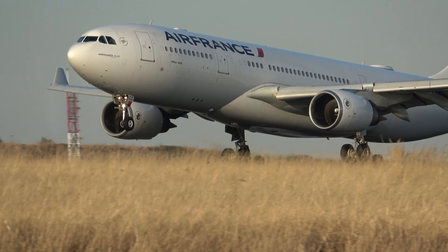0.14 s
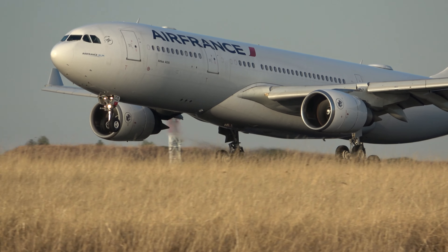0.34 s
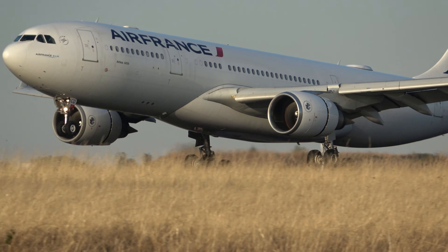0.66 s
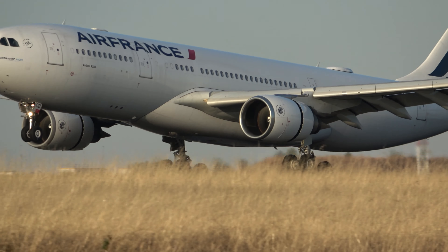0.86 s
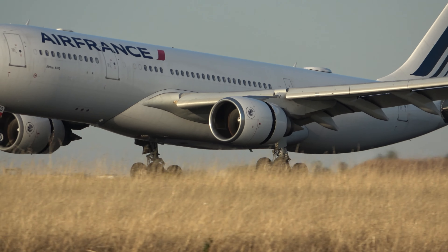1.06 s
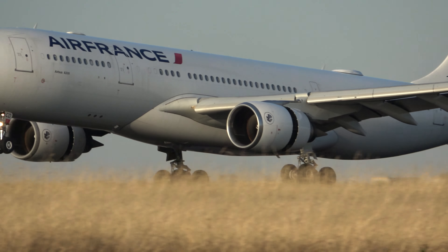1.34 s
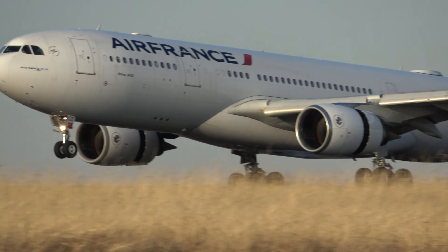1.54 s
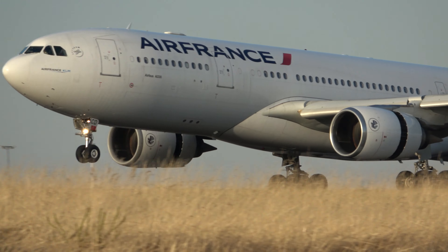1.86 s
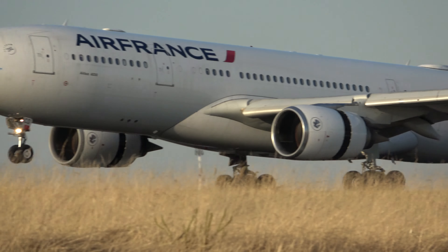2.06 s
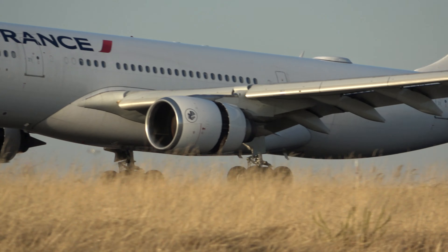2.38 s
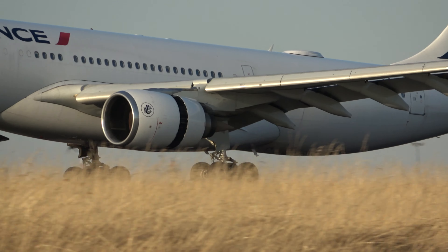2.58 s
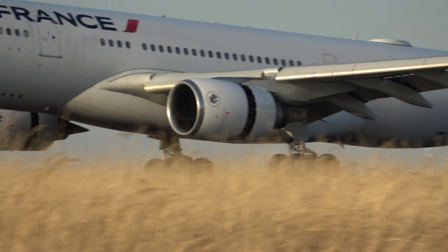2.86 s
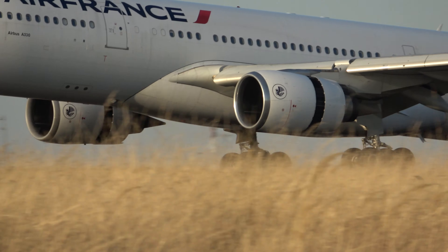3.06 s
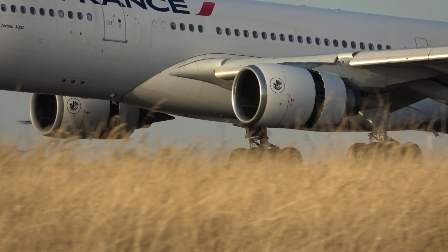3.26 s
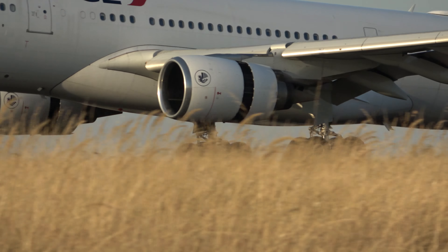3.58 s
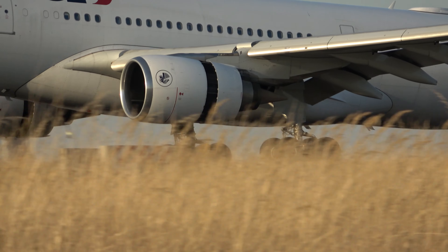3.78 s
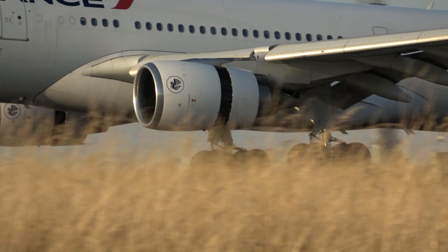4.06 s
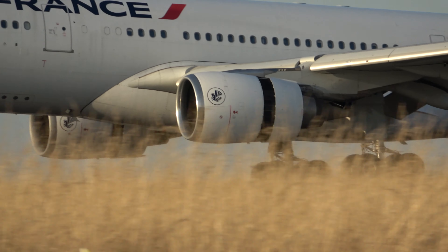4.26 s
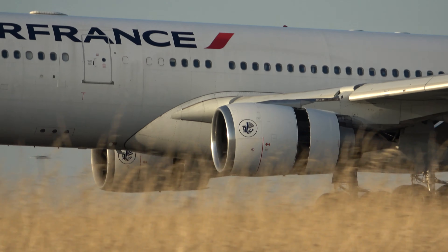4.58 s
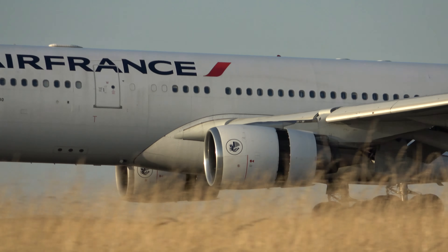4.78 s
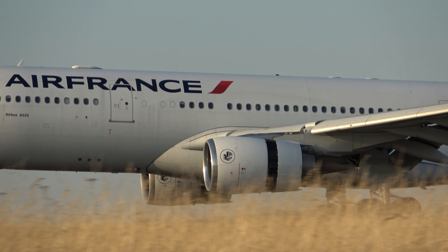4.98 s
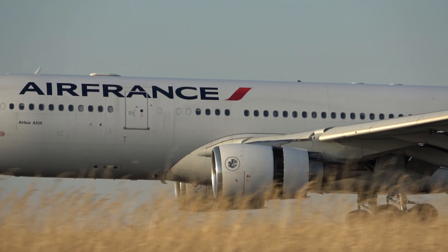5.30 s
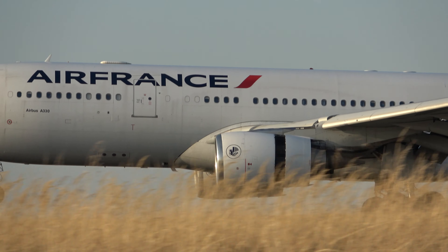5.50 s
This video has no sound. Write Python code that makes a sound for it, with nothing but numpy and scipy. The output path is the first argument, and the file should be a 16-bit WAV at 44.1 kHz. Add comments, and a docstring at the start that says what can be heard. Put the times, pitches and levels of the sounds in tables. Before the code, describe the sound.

Open windy field beside a runway, one distant-perspective microphone, no echo. From 0 s, low lumpy wind buffets and flutters, overloading slightly at its peaks, with gusts every few tenths of a second and tiny lulls between. A rough, high turbine whine near 3.1 kHz sinks gradually to about 2.6 kHz by 3 s, clearest around 0.7 to 1.5 s, with a fainter, slightly lower second engine beside it. Beneath is a modest hollow jet roar. From about 2.2 s reverse thrust grows; by 3.4 s a broad rushing roar dominates the jet sound and the whine is almost buried. A brief mid-low howl colours it near 3.9 s. A sudden wind slap thuds at 4.6 s. Around 5.1 to 5.3 s the exhaust leaps into a bright, hissing blast with a faint higher whine rising, eases near 5.4 s, then surges again and stops at full strength around 5.6 s.

```python
"""A jet airliner rolls out after touchdown, heard across a windy grass field: its turbine whines sink,
then the reversed exhaust swells into a brighter and brighter roar while wind buffets the microphone.
The exhaust is bands of shaped noise, the whines are sine tones roughened by slow chance, and the wind is
low lumpy noise mixed with throbbing eddies, plus one sudden slap. A limiter and clipper catch the peaks."""
import sys
import numpy as np
from scipy import signal
from scipy.fft import rfft, irfft, next_fast_len
from scipy.io import wavfile
from scipy.ndimage import uniform_filter1d, minimum_filter1d

SR = 44100
rng = np.random.default_rng(int(sys.argv[2]) if len(sys.argv) > 2 else 0)


def unload_wav(signal):
    """Save mono or channel-first audio to the path in sys.argv[1] as 16-bit WAV at rate SR, clipped to [-1, 1]."""
    wavfile.write(
        sys.argv[1],
        SR,
        np.round(np.clip(np.atleast_2d(signal).T, -1, 1) * 32767).astype(np.int16),
    )


N = 248724

# Colour of the microphone hiss. Each row: frequency in Hz, relative level per Hz in dB.
MIC_HISS_COLOUR = [(3000, 5), (6800, 5), (9000, 0.5), (15500, -3.5)]

# Steady wind on the microphone, before gusts, lulls and flurries.
# Each row: time in seconds, buffeting level in dB, flutter level in dB.
WIND_LEVELS = [(0, -17, -23), (.45, -13.5, -28.5), (1.5, -10.7, -26), (2.2, -12.8, -26), (2.7, -14, -23.8),
               (3.3, -15.3, -26.5), (4.1, -13.5, -23.5), (4.85, -12, -17.3), (5.18, -13.3, -20.5),
               (5.35, -8.7, -17.7), (5.64, -11.7, -19.7)]
# Eddies shed at the microphone. Each row: time in seconds, mean eddies per second,
# share of the buffeting power from 0 to 1.
EDDY_SHEDDING = [(0, 48.6, .25), (1.05, 38.8, .5), (1.3, 26, .75), (1.85, 31.2, .7), (2.5, 18.1, 0.5),
                 (2.98, 49, .25), (3.3, 20, .35), (4.4, 31, .3), (4.7, 46.3, .55), (5.5, 53, .9)]
# Colour of the slow, lumpy buffeting. Each row: frequency in Hz, relative level per Hz in dB.
BUFFET_COLOUR = [(6, -11.5), (12, -0.5), (22, 0), (35, -3.5), (52, -1), (68, -5), (90, -19.5), (140, -40.5)]
# Colour of the quicker flutter. Each row: frequency in Hz, relative level per Hz in dB.
FLUTTER_COLOUR = [(45, -14), (72, 0), (95, -4), (125, -9.5), (160, -15.5), (230, -27), (600, -48)]
# The strongest gusts. Each row: centre in seconds, length in seconds, lift of the buffeting in dB,
# lift of the flutter in dB.
GUSTS = [(.42, 0.084, 2.5, -3), (.59, 0.078, 2.5, 1), (.8, .07, 3.5, 2), (1.03, .07, 1, 5),
         (1.19, .1, 3, 0), (1.4, .1, -0.5, 6), (1.72, 0.13, 1, 5), (1.83, .07, 3.5, 0), (1.99, .07, 3, -3),
         (2.11, .07, 4, 3), (3.02, 0.24, 5, 0), (3.26, .12, 3.5, -0.5), (3.51, .05, 6, 1),
         (3.7, .1, 3.5, 2), (4.44, .1, 6, 1), (4.76, .14, 5, 1), (5.56, .08, 2, 1)]
# Moments when the wind drops. Each entry: centre in seconds.
LULL_TIMES = [.73, 1.93, 2.2, 2.82, 3.42, 3.59, 3.88, 4.53, 4.99]
LULL_LENGTH_S, LULL_DB = 0.061, -6.5
FLURRY_DB, FLURRY_RATE_HZ = 1.2, 6.1  # chance swings of the wind's level

# Turbine whine, winding down and then up for reverse thrust. Each row: time in seconds, pitch in Hz,
# reference level in dB, upper stage level in dB.
WHINE = [(0, 3155, -46.5, -78), (.45, 3060, -44.5, -74), (.7, 3010, -41.5, -71), (1.1, 2936, -41.5, -63),
         (1.45, 2863, -40, -62), (1.75, 2810, -44.5, -64), (2.15, 2740, -45, -60), (2.4, 2705, -48, -64),
         (2.95, 2600, -46.5, -53.5), (3.4, 2620, -48, -58), (3.8, 2686, -62.5, -69),
         (4.95, 2680, -60.5, -58.5), (5.1, 2735, -55, -46), (5.25, 2810, -54, -42), (5.4, 2800, -61, -58),
         (5.64, 2780, -65, -66)]
# Blade rows that beam forwards. Each row: multiple of the whine pitch,
# level in dB relative to the whine's reference, before the forward fade.
FORWARD_ROWS = [(1.335, -19), (1.455, -13)]

# Strength of the jet at the microphone, as the airliner nears and the reversers open.
# Each row: time in seconds, strength in dB.
JET_STRENGTH = [(0, -18), (.75, -14.5), (1.25, -14), (1.7, -15.5), (2.2, -12), (2.85, -8), (3.15, -2.5),
                (3.48, 0.2), (4.0, -1), (4.85, 2.5), (5.08, 5.5), (5.2, 12), (5.3, 12), (5.43, 8),
                (5.6, 13)]
# The jet noise surges and sags. Each row: centre in seconds, length in seconds, lift of the roar in dB,
# of the rush in dB, of the bright band in dB, of the hollow ring in dB.
SURGES = [(1.05, .55, 1.3, 3.3, .8, 1.8), (1.78, .35, 1, -.3, -1.8, -3), (2.22, .22, 0, 3, 1.5, .5),
          (2.68, .3, 3, .3, -.5, -2), (3.44, .45, -1.8, 3.3, 1.6, .8), (4.1, .45, 1, -1.3, 0, 2),
          (4.62, .22, .5, -2.5, -.3, -1.5), (5.55, .22, 0, 4.5, 1.3, 3)]
# Colour of the deep roar. Each row: frequency in Hz, relative level per Hz in dB.
ROAR_COLOUR = [(90, -10.5), (160, 0), (205, -0.6), (270, 0.23), (350, -2.2), (450, 0.3), (600, -2),
               (850, -1.5), (1200, -9.5), (2000, -26.5)]
# Colour of the mid rush. Each row: frequency in Hz, relative level per Hz in dB.
RUSH_COLOUR = [(600, -14.5), (1150, 0.5), (1600, 0.5), (2000, -3.5), (2400, -7.5), (3000, -20.5),
               (3600, -34)]
# Colour of the bright band. Each row: frequency in Hz, relative level per Hz in dB.
BRIGHT_COLOUR = [(1600, -17), (2000, -3.5), (2400, -2), (2900, -0.5), (3250, -1.2), (3550, -0.4),
                 (3900, -8), (4400, -31)]
# Colour of the exhaust hiss. Each row: frequency in Hz, relative level per Hz in dB.
HISS_COLOUR = [(3000, -10), (4000, 0.5), (4600, 1), (5050, -2.5), (5550, -6.5), (6050, -16.5),
               (6700, -24.5), (7600, -33.5), (10000, -45), (15000, -54)]
# Each part of the jet: base level in dB at strength 0, and dB gained per dB of strength.
ROAR_DB, ROAR_FOLLOWS = -24.5, 0.37
RUSH_DB, RUSH_FOLLOWS = -28.7, 0.46
BRIGHT_DB, BRIGHT_FOLLOWS = -31.3, 0.75
HISS_DB = -41.5  # follows the strength one for one
HOLLOW_DB, HOLLOW_FOLLOWS = -26.8, 0.14
HOWL_AT_S, HOWL_LENGTH_S, HOWL_DB = 3.925, 0.43, -29.5  # one brief engine howl

TOP_CUTOFF_HZ = 16400


def from_db(db):
    """Decibels to gain."""
    return 10 ** (np.asarray(db) / 20)


def rms_one(x):
    """Scale to unit rms."""
    return x / np.sqrt(np.mean(x ** 2) + 1e-20)


def in_time(rows):
    """Draw one sample-by-sample curve for each column after the time."""
    times, *columns = np.transpose(rows)
    return [np.interp(np.arange(N) / SR, times, column) for column in columns]


def swell(at_s, length_s):
    """A bell-shaped rise and fall of height 1, with the given length at half height."""
    offset = np.arange(N) / SR - at_s
    return 2 ** -((2 * offset / length_s) ** 2)


def lifts(rows):
    """Sum a table of swells into one dB curve for each of its level columns."""
    return sum(np.outer(db, swell(at_s, length_s)) for at_s, length_s, *db in rows)


def shaped_noise(gain_at):
    """Unit-rms noise whose amplitude spectrum is a function of frequency."""
    size = next_fast_len(N)
    hz = np.maximum(np.fft.rfftfreq(size, 1 / SR), 1)
    spectrum = rfft(rng.standard_normal(size)) * gain_at(hz)
    return rms_one(irfft(spectrum, size)[:N])


def coloured(points):
    """Noise with a given spectrum, falling steeply beyond its ends."""
    f, db = np.transpose(points)

    def gain_at(hz):
        skirts = np.minimum(1, np.minimum(hz / f[0], f[-1] / hz)) ** 6
        return from_db(np.interp(np.log(hz), np.log(f), db)) * skirts

    return shaped_noise(gain_at)


def resonant(centre_hz, width_hz):
    """Noise through a resonance; width is from the centre to half amplitude."""
    return shaped_noise(lambda hz: 1 / (1 + ((hz - centre_hz) / width_hz) ** 2))


def drift(rate_hz):
    """Slow chance wandering of spread 1, at half amplitude by the given rate."""
    return shaped_noise(lambda hz: 1 / (1 + (hz / rate_hz) ** 2))


def evened(x, span_s):
    """Hold the slow level of a sound steady and keep its fast lumps."""
    power = uniform_filter1d(x ** 2, max(int(span_s * SR), 2))
    return rms_one(x / np.sqrt(power + 1e-6))


def microphone_hiss():
    """Electrical self-noise: a faint, steady treble hiss."""
    return from_db(-71) * coloured(MIC_HISS_COLOUR)


def wind(overtone_db):
    """Lumpy pressure at the microphone, with gusts and lulls; regular eddies throb in steady flow."""
    lulls = LULL_DB * sum(swell(at_s, LULL_LENGTH_S) for at_s in LULL_TIMES)
    flurries = FLURRY_DB * drift(FLURRY_RATE_HZ)
    buffet_db, flutter_db = in_time(WIND_LEVELS) + lifts(GUSTS) + lulls + flurries

    eddy_hz, share = in_time(EDDY_SHEDDING)
    wandering_hz = eddy_hz * (1 + 0.0601 * drift(rate_hz=15))
    phase = 2 * np.pi * np.cumsum(wandering_hz) / SR
    throb = np.sqrt(2) * (np.sin(phase) + from_db(overtone_db) * np.sin(2 * phase))
    lumps = evened(coloured(BUFFET_COLOUR), span_s=0.17)
    # square roots share out power rather than amplitude
    pressure = evened(np.sqrt(share) * throb + np.sqrt(1 - share) * lumps, span_s=0.12)

    small_eddies = evened(coloured(FLUTTER_COLOUR), span_s=0.08)
    return from_db(buffet_db) * pressure + from_db(flutter_db) * small_eddies


def gust_slap(at_s, pitch_hz, drive_db, decay_s):
    """One sudden gust slaps the microphone: a few dying swings of pressure, softened by a low-pass."""
    age = np.maximum(np.arange(N) / SR - at_s, 0)
    swings = np.sin(2 * np.pi * pitch_hz * age) * np.exp(-age / decay_s)
    soften = signal.butter(2, 300, fs=SR, output="sos")
    return from_db(drive_db) * signal.sosfilt(soften, swings)


def blade_tone(pitch_hz, scatter_hz, steady):
    """One blade row's tone, scattered by turbulent air into a narrow, rough band around its pitch."""
    wandering_hz = pitch_hz * (1 + 0.004 * drift(rate_hz=25))
    phase = 2 * np.pi * np.cumsum(wandering_hz) / SR
    in_step = (steady + drift(scatter_hz)) * np.sin(phase)
    out_of_step = drift(scatter_hz) * np.cos(phase)
    return rms_one(in_step + out_of_step)


def turbine_whine(forward_fade_db_per_s, far_engine_db):
    """Blade rows on one shaft glide together; the forward ones fade as the intake turns away."""
    pitch, level, upper = in_time(WHINE)
    out = from_db(level - 2) * blade_tone(pitch, scatter_hz=40, steady=1.1)
    # the far engine turns a little slower
    far_engine = blade_tone(0.955 * pitch, scatter_hz=70, steady=0.4)
    out += from_db(level + far_engine_db) * far_engine
    out += from_db(upper) * blade_tone(1.783 * pitch, scatter_hz=45, steady=0.8)
    forward = level - forward_fade_db_per_s * np.arange(N) / SR
    for multiple, db in FORWARD_ROWS:
        out += from_db(forward + db) * blade_tone(multiple * pitch, scatter_hz=35, steady=0.97)
    return out


def engine_resonances():
    """A broad hollow ring that grows more slowly than the roar, and a brief narrow howl below it."""
    strength, = in_time(JET_STRENGTH)
    *_, ring_lift = lifts(SURGES)
    hollow_db = HOLLOW_DB + HOLLOW_FOLLOWS * strength + ring_lift
    ring = from_db(hollow_db) * evened(resonant(centre_hz=932, width_hz=131), span_s=0.29)
    howl_level = from_db(HOWL_DB) * swell(HOWL_AT_S, HOWL_LENGTH_S)
    howl = howl_level * evened(resonant(centre_hz=483.0, width_hz=11), span_s=0.23)
    return ring + howl


def dulled(x, level_db, corner_hz, per_db):
    """The fainter and farther the jet, the more of its treble the air has taken."""
    low_pass = signal.butter(2, corner_hz, fs=SR, output="sos")
    dull = signal.sosfiltfilt(low_pass, x)
    far = np.clip((level_db.max() - level_db) * per_db, 0, 1)
    return evened(x + far * (dull - x), span_s=0.16)


def jet_noise(shimmer_db):
    """Exhaust turbulence: big eddies roar, small ones rush and hiss and grow faster with strength."""
    strength, = in_time(JET_STRENGTH)
    roar_lift, rush_lift, bright_lift, _ = lifts(SURGES)
    shimmer = shimmer_db * drift(rate_hz=17)  # moving air makes the highs flicker

    roar_db = ROAR_DB + ROAR_FOLLOWS * strength + roar_lift
    roar = from_db(roar_db) * evened(coloured(ROAR_COLOUR), span_s=0.2)
    rush_db = RUSH_DB + RUSH_FOLLOWS * strength + rush_lift + shimmer
    rush = from_db(rush_db) * coloured(RUSH_COLOUR)
    bright_db = BRIGHT_DB + BRIGHT_FOLLOWS * strength + bright_lift + shimmer
    bright_noise = dulled(coloured(BRIGHT_COLOUR), strength, corner_hz=2300, per_db=0.013)
    bright = from_db(bright_db) * bright_noise
    hiss = from_db(HISS_DB + strength + shimmer) * evened(coloured(HISS_COLOUR), span_s=0.19)
    return roar + rush + bright + hiss


def scene():
    """Layer the microphone hiss, the wind and the airliner into one channel."""
    gusts = wind(overtone_db=-20.5)
    gusts += gust_slap(at_s=4.605, pitch_hz=104, drive_db=-4, decay_s=0.026)
    airliner = turbine_whine(forward_fade_db_per_s=3.0, far_engine_db=-9.0)
    airliner += engine_resonances() + jet_noise(shimmer_db=0.8)
    return (microphone_hiss() + gusts + airliner)[None]


def record(dry):
    """A quick limiter ducks the biggest peaks, their last tips clip, and the top is cut."""
    hold = int(0.006 * SR)  # 6 ms, used for the limiter and the opening fade
    ducking = minimum_filter1d(np.minimum(1, 1.15 / (np.abs(dry) + 1e-9)), hold)
    clipped = np.clip(dry * uniform_filter1d(ducking, hold), -1, 1)
    fade_in = np.minimum(1, np.arange(N) / hold)
    top_cut = signal.cheby2(14, 60, TOP_CUTOFF_HZ, fs=SR, output="sos")
    return signal.sosfilt(top_cut, clipped * fade_in)


dry = scene()
out = record(dry)
unload_wav(out)
```